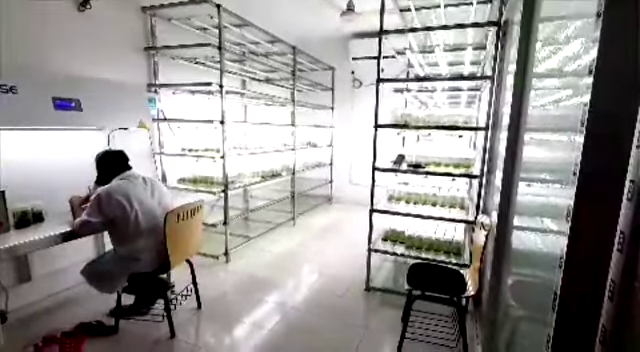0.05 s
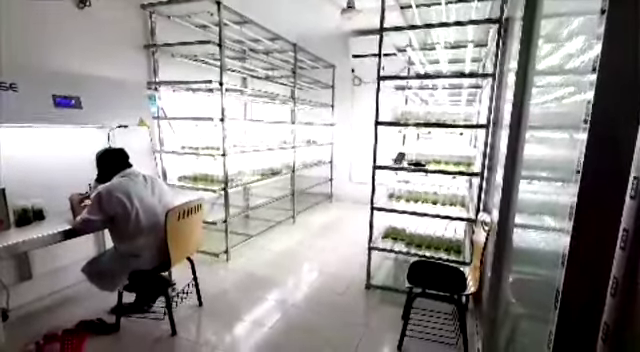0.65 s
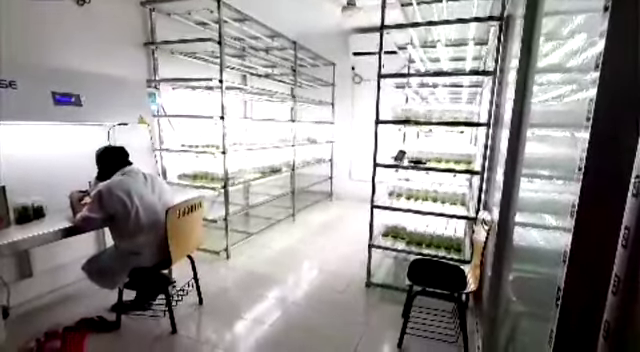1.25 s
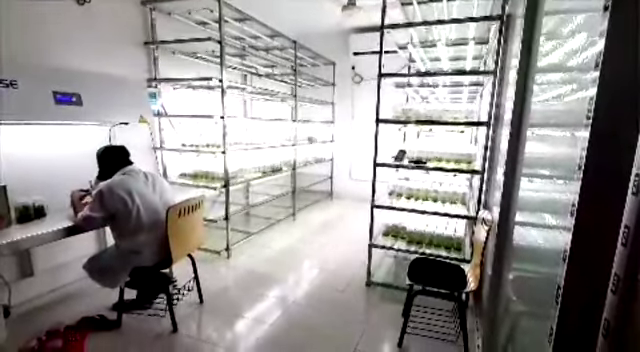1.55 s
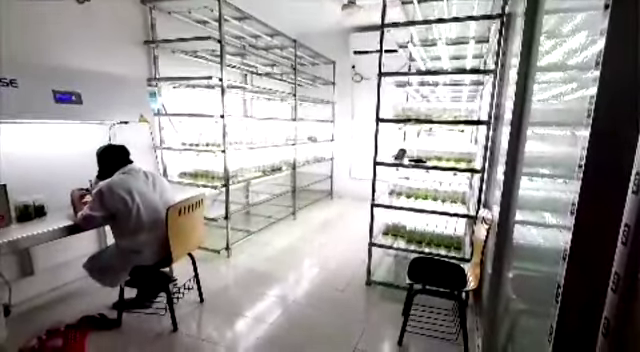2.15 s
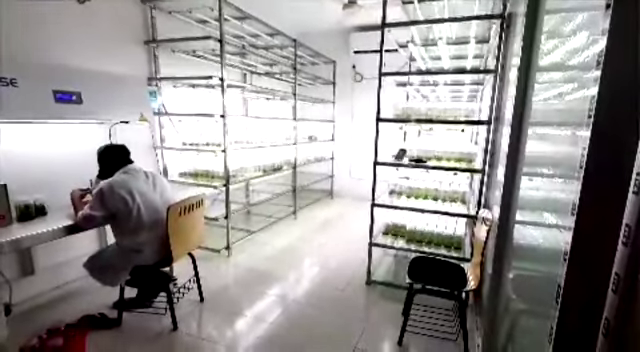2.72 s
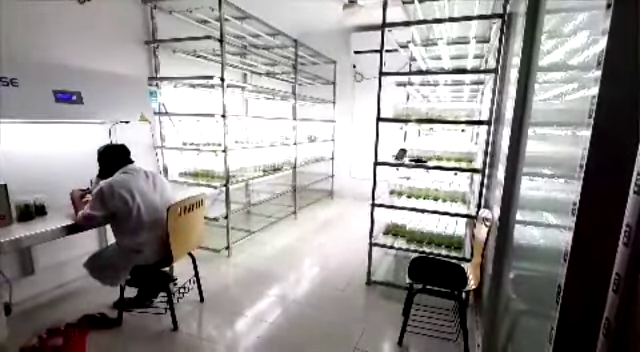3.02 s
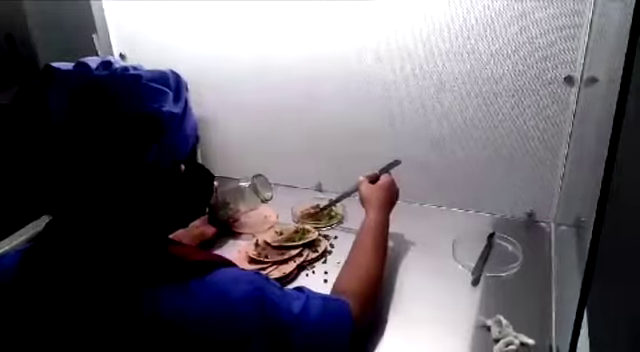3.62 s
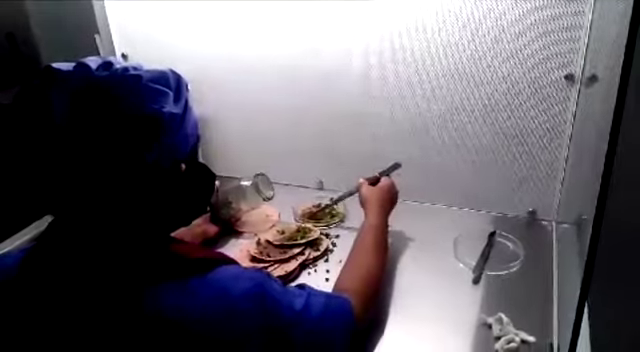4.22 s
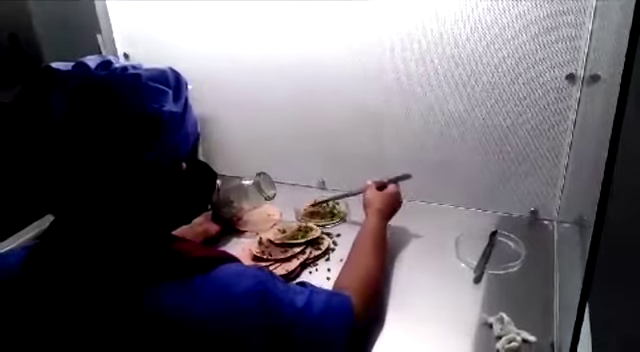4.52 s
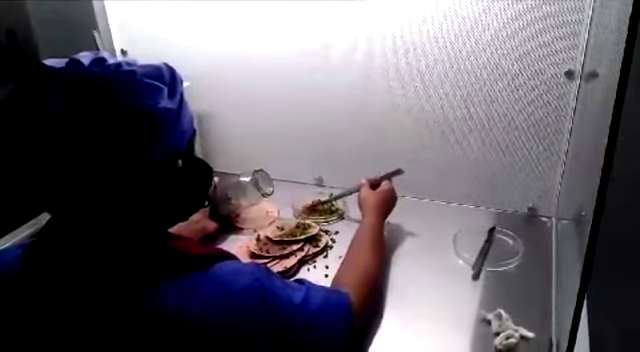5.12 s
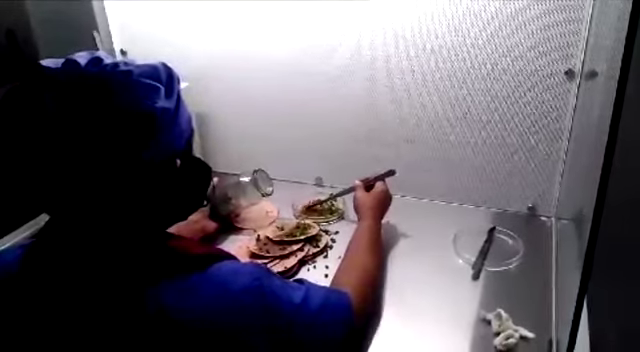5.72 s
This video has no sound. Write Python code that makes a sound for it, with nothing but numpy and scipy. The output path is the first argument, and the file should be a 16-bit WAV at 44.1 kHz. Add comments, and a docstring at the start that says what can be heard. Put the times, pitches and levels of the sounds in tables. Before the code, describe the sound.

Fans drone steadily in a plant lab, a rough low hum over rumbling ducts and a wash of faintly whistling air. Two tiny ticks pass before the drone breaks off suddenly. A quieter clean-air cabinet follows, heard from close by, its boxy hiss soon dropping to a gentle hum. Five soft, dull knocks sound on the work bench.

```python
"""Plant lab ventilation and clean-air cabinet

Ventilation drones: duct rumble, fan tones, narrow whistles and rushing air, with two faint ticks.
It breaks off and a clean-air cabinet fades in, close by. Air hisses through its filter wall for a
second, then sinks to the soft hum of the blower; something knocks dully on the bench."""
import sys
import numpy as np
from scipy import signal
from scipy.fft import rfft, irfft, next_fast_len
from scipy.io import wavfile
from scipy.ndimage import uniform_filter1d, map_coordinates

SR = 44100
rng = np.random.default_rng(int(sys.argv[2]) if len(sys.argv) > 2 else 0)


def generate_wav(sig):
    """Save sig (samples, or channels by samples) to the path in sys.argv[1] as 16-bit PCM at SR."""
    pcm = np.round(np.clip(np.atleast_2d(sig).T, -1, 1) * 32767).astype(np.int16)
    wavfile.write(sys.argv[1], SR, pcm)


N = 253971


def amp(db):
    """Decibels to gain."""
    return 10 ** (np.asarray(db) / 20)


def unit(x):
    """Scale to rms 1."""
    return x / np.sqrt(np.mean(x ** 2) + 1e-20)


def along(points, hz):
    """Read a curve of (frequency, value) points on a log frequency axis."""
    freqs, values = np.transpose(points)
    return np.interp(np.log(hz + 1), np.log(freqs + 1), values)


def since(s):
    """Seconds passed since time s, zero before it."""
    return np.maximum(np.arange(N) / SR - s, 0)


def swell(middle_s, length_s, lift_db):
    """A gain that leaves 1 in one rounded arch and returns."""
    place = 2 * (np.arange(N) / SR - middle_s) / length_s
    return amp(lift_db * np.maximum(1 - place ** 2, 0))


def wobble(rate):
    """A smooth random curve, rate knots a second."""
    knots = rng.standard_normal(int(N * rate / SR) + 4)
    return map_coordinates(knots, [np.arange(N) * rate / SR])


def filtered(x, response):
    """EQ x with a gain given as a function of frequency."""
    size = next_fast_len(N + 8192)
    return irfft(rfft(x, size) * response(np.fft.rfftfreq(size, 1 / SR)), size)[..., :N]


def spread(pair, correlation, balance):
    """Mix two unrelated signals into a diffuse field: bass shared by both ears, treble not."""
    angle = lambda hz: np.arccos(np.clip(along(correlation, hz), -1, 1)) / 2
    mid, side = filtered(pair, lambda hz: np.array([np.cos(angle(hz)), np.sin(angle(hz))]))
    pan = lambda hz: amp(np.outer([.5, -.5], along(balance, hz)))
    return filtered(np.array([mid + side, mid - side]), pan)


def turbulence(spectrum, patchy_db):
    """Two noises of rms 1 whose colour shifts in small patches as eddies pass."""
    cells = signal.stft(rng.standard_normal((2, N)), nperseg=512)[2]
    eddies = uniform_filter1d(rng.standard_normal(cells.shape[1:]), size=7, axis=0)  # across pitch
    eddies = uniform_filter1d(eddies, size=14, axis=1)  # across time
    pair = signal.istft(cells * amp(patchy_db * unit(eddies)), nperseg=512)[1][:, :N]
    return unit(filtered(pair, lambda hz: amp(along(spectrum, hz))))


def resonance(hz, half_width_hz):
    """Two noises of rms 1 ringing in one resonance."""
    peak = lambda f: 1 / (1 + ((f - hz) / half_width_hz) ** 2)
    return unit(filtered(rng.standard_normal((2, N)), peak))


def rough_tone(hz, wander_hz, skirt_db, skirt_hz=13.4, flutter_db=3.0):
    """A fan tone that wanders in pitch and level, smeared by turbulence into a noisy skirt; rms 1."""
    phase = 2 * np.pi * np.cumsum(hz + wander_hz * wobble(rate=10)) / SR
    flutter = amp(flutter_db * wobble(rate=6.5))
    tone = unit(flutter * np.array([np.sin(phase), np.cos(phase)]))
    return unit(tone + amp(skirt_db) * resonance(hz, skirt_hz))


# EQ curve of the duct rumble: (frequency [Hz], relative level [dB])
RUMBLE_EQ = [(20, -39), (43, -40), (57, -7.5), (78, -11), (92, -6.5), (118, 1), (132, -1), (152, -5.5),
             (185, -6), (225, -8), (290, -5), (370, -14.5), (460, -26), (800, -63)]
def duct_rumble():
    """Air in the ducts lays down a deep, even bed of noise."""
    return amp(-34.5) * turbulence(RUMBLE_EQ, patchy_db=0.0)


# EQ curve of the air at the outlets: (frequency [Hz], relative level [dB])
OUTLET_EQ = [(250, -17), (450, -1), (600, -2), (860, 0.5), (1350, -3), (1850, -2.5), (2300, -6),
             (3000, -8.5), (4300, -12.5), (6400, -22), (8100, -21), (8600, -28), (12000, -26.5),
             (15700, -34)]
def outlet_air():
    """Air rushes from the outlets in a broad midrange wash."""
    return amp(-39.5) * turbulence(OUTLET_EQ, patchy_db=0.96)


# fan and motor tones: (pitch [Hz], level [dB], wander [Hz], skirt against the tone [dB])
FAN_TONES = [(69.63, -41, 1.93, -4.5), (140.7, -39, 1.05, -14.5), (162.2, -39.5, 0.95, -10.5),
             (300.3, -41.5, 1.54, -1.5), (348.6, -50.5, 1.81, -4.5), (422, -54, 1.6, -4),
             (516, -58.5, 2.7, -2.5), (792, -56.5, 1.36, -6)]
def fan_hum():
    """Spinning fans and motors hold a rough, low chord."""
    return sum(amp(db) * rough_tone(hz, wander, skirt_db) for hz, db, wander, skirt_db in FAN_TONES)


def wavering(pair, depth=0.012):
    """Unsteady air bends a whistle up and down; depth is a share of its pitch."""
    clock = np.cumsum(1 + depth * wobble(rate=11))
    return np.array([np.interp(clock, np.arange(N), side) for side in pair])


# narrow resonances of ducts and grilles: (pitch [Hz], half-width [Hz], level [dB])
WHISTLES = [(92.5, 6.8, -41), (129.4, 3.1, -40.5), (181.4, 6.9, -43), (209, 7.8, -48), (705, 9.4, -59),
            (985, 29, -56.5), (1220, 28, -53), (1537, 36, -49.5), (1680, 43, -71), (2023, 32, -53.5),
            (2400, 140, -58), (2680, 45, -59.5)]
def whistles():
    """Passing air keeps the ducts and grilles ringing."""
    return sum(amp(db) * wavering(resonance(hz, width)) for hz, width, db in WHISTLES)


# surges and sags in the low end: (middle time [s], length [s], frequency [Hz], lift [dB])
SURGES = [(1.69, 0.3, 137, 3.5), (2.04, 0.2, 92, 3), (2.8, 0.26, 70, 3.5), (2.9, 0.26, 128, 3),
          (3.14, 0.24, 140, -5)]
def surging(hum, width_hz=29):
    """Each surge briefly lifts or lowers one low band of the hum."""
    band = lambda hz: filtered(hum, lambda f: np.exp(-((f - hz) / width_hz) ** 2))
    return hum + sum((swell(s, length, db) - 1) * band(hz) for s, length, hz, db in SURGES)


# stereo width of the room: (frequency [Hz], left-right correlation [-1 to 1])
ROOM_CORRELATION = [(100, 1), (190, 0.98), (300, 0.8), (400, 0.76), (500, 0.46), (700, 0.66), (900, 0.42),
                    (1200, -0.36), (2400, 0.096), (5000, -0.15), (11000, -0.36)]
# stereo balance of the room: (frequency [Hz], left minus right [dB])
ROOM_BALANCE = [(60, -0.5), (200, -1.5), (540, 1.5), (1100, -1), (2500, -1.5), (4200, -3.5), (9000, -2),
                (13000, -4.5)]
def ventilation(end_s=3.231):
    """Fans hum through rumbling ducts; air rushes and whistles at the grilles, until all breaks off."""
    drift = amp(-0.52 * wobble(rate=2.77))  # rumble and fans rise and fall together
    rumble = duct_rumble()
    air = outlet_air()
    hum = surging(drift * (rumble + fan_hum()) + whistles())
    after = since(end_s)
    cutoff = amp(-21 * np.minimum(after / 0.005, 1) - 1100 * after)  # a sudden drop, then a short tail
    return cutoff * spread(hum + air, ROOM_CORRELATION, ROOM_BALANCE)


# faint ticks: (time [s], body pitch [Hz], body level [dB],
# bright pitch [Hz], bright level [dB], left minus right [dB])
TICKS = [(2.3102, 3600, -33, 11000, -45.5, -18), (2.7451, 4800, -39.5, 9700, -46.5, 16)]
def ticks(t60_s=0.005, width_share=0.25):
    """Tiny hard contacts to either side: each a flick of noise in a body resonance and a bright one."""
    out = np.zeros((2, N))
    for s, body_hz, body_db, bright_hz, bright_db, pan_db in TICKS:
        age = since(s)
        pan = amp(pan_db * np.array([[.5], [-.5]]))
        body = amp(body_db) * resonance(body_hz, width_share * body_hz)
        bright = amp(bright_db) * resonance(bright_hz, width_share * bright_hz)
        out += pan * (age > 0) * amp(-60 * age / t60_s) * (body + bright)
    return out


# EQ curve of the air through the filter wall: (frequency [Hz], relative level [dB])
FILTER_EQ = [(25, -28), (38, -30), (48, -3.5), (72, -6), (108, 0.5), (140, -6.5), (170, -8.5), (270, -11),
             (340, -6.5), (410, -15), (620, -21), (820, -12), (1100, -17.5), (1900, -20.5), (2500, -22),
             (4000, -31.5), (5500, -41), (7500, -55), (15000, -85)]
def filter_hiss(flow):
    """Air pushed through the cabinet's filter wall hisses in step with the flow."""
    return amp(-41) * flow * turbulence(FILTER_EQ, patchy_db=1.1)


# EQ curve of the blower: (frequency [Hz], relative level [dB])
BLOWER_EQ = [(25, -26), (58, 2.5), (150, 0), (260, -8), (330, -2), (410, -11), (610, -18.5), (770, -8),
             (980, -10.5), (1080, -19), (1900, -19.5), (2200, -20.5), (3000, -27), (4800, -39.5),
             (8000, -41), (11000, -48), (15700, -52)]
def blower_air():
    """The blower behind the filter keeps up a soft, steady rush."""
    return amp(-50) * turbulence(BLOWER_EQ, patchy_db=0.7)


# resonances of the cabinet's hollow: (frequency [Hz], half-width [Hz], lift [dB])
HOLLOW_PEAKS = [(506, 77, 5.5), (678, 29, 6.5), (929, 55, 4.5), (1233, 63, 3), (1526, 40, 6), (1690, 87, 3),
                (2950, 180, 1)]
def hollow(air):
    """The cabinet's cavity rings along with the air and gives it a boxy colour."""
    lift_db = lambda f: sum(db * np.exp(-((f - hz) / width) ** 2) for hz, width, db in HOLLOW_PEAKS)
    return filtered(air, lambda f: amp(lift_db(f)))


def flow_gain(flow, full_db, rest_db):
    """Crossfade between the level at full flow (1) and the level at rest (0)."""
    return flow * amp(full_db) + (1 - flow) * amp(rest_db)


def blower_drone(flow):
    """The blower's low note swells once, then sinks with the airflow."""
    gain = flow_gain(flow, full_db=-47.6, rest_db=-62) * swell(middle_s=3.72, length_s=0.6, lift_db=6.2)
    return gain * rough_tone(hz=87.7, wander_hz=2, skirt_db=-9)


# tones of the cabinet: (pitch [Hz], level at full flow [dB], level at rest [dB], wander [Hz])
CABINET_TONES = [(152.2, -52.5, -59.5, 0.72), (170, -53, -68, 1.5), (191.2, -51.5, -65.5, 0.77),
                 (216.7, -54, -68, 1.93), (245.3, -57.5, -69, 1.22), (302.7, -52, -62.5, 1.01),
                 (359, -59.5, -77, 1.8), (760, -60, -64.5, 5.8), (779, -56, -69, 7)]
def cabinet_hum(flow):
    """A cluster of rough tones, lifted by the airflow."""
    return sum(flow_gain(flow, full_db, rest_db) * rough_tone(hz, wander, skirt_db=-4)
               for hz, full_db, rest_db, wander in CABINET_TONES)


# stereo width of the cabinet: (frequency [Hz], left-right correlation [-1 to 1])
CABINET_CORRELATION = [(100, 1), (300, 0.91), (520, 0.81), (600, 0.58), (760, 0.86), (970, 0.44),
                       (1250, -0.21), (2800, 0.11), (5000, -0.11), (11000, -0.21)]
# stereo balance of the cabinet: (frequency [Hz], left minus right [dB])
CABINET_BALANCE = [(60, -0.4), (450, -1), (850, 1.6), (1400, 0.5), (2500, 2), (4200, -1.5), (7000, 1)]
def cabinet(start_s=3.28, fade_s=0.27, flow_end_s=4.429, sink_db_per_s=88):
    """The cabinet fades in at full flow; the flow then sinks and leaves the blower humming."""
    fade_in = np.minimum(since(start_s) / fade_s, 1)
    flow = amp(-sink_db_per_s * since(flow_end_s))
    air = hollow(filter_hiss(flow) + blower_air())
    hum = blower_drone(flow) + cabinet_hum(flow)
    return fade_in * spread(air + hum, CABINET_CORRELATION, CABINET_BALANCE)


# dull knocks on the bench: (time [s], pitch [Hz], level [dB], 60 dB decay time [s])
KNOCKS = [(4.589, 308, -44, 0.085), (4.792, 178, -40.5, 0.16), (5.1, 332, -42.5, 0.15),
          (5.616, 307, -40.5, 0.062), (5.729, 344, -34, 0.057)]
def knock(s, hz, db, t60_s):
    """A soft blow on the bench rings one low mode briefly."""
    age = since(s)
    attack = 1 - np.exp(-age / 0.00065)
    return attack * amp(db - 60 * age / t60_s) * np.sin(2 * np.pi * hz * age)


def scene():
    """First the ventilation with its ticks, then the cabinet with the knocks."""
    return ventilation() + ticks() + cabinet() + sum(knock(*row) for row in KNOCKS)


def record(dry, top_hz=15720):
    """A brick-wall low-pass takes off the very top of the mix."""
    return filtered(dry, lambda hz: hz < top_hz)


dry = scene()
out = record(dry)
generate_wav(out)
```